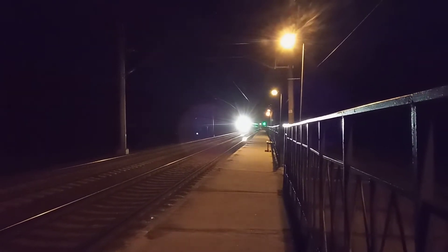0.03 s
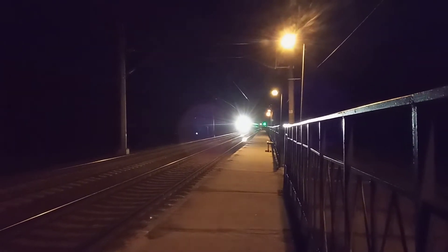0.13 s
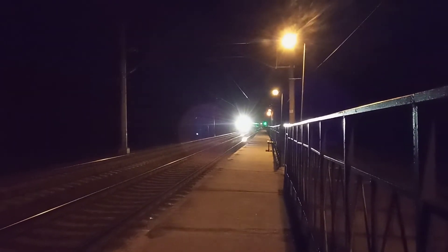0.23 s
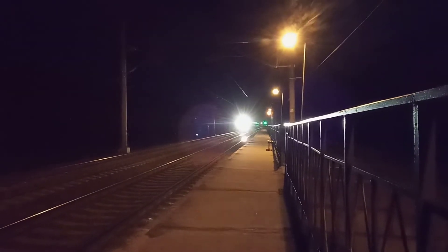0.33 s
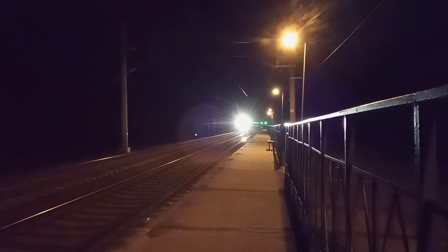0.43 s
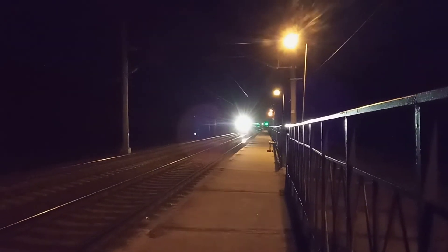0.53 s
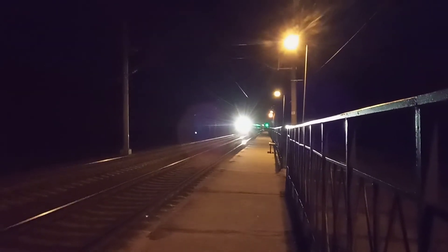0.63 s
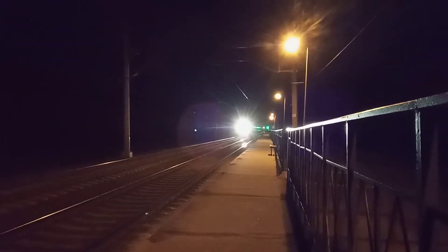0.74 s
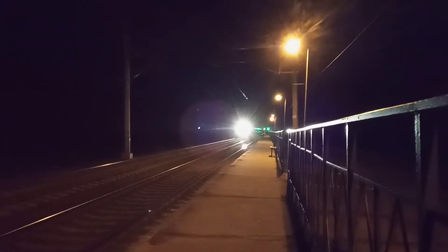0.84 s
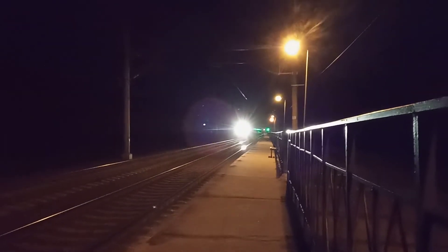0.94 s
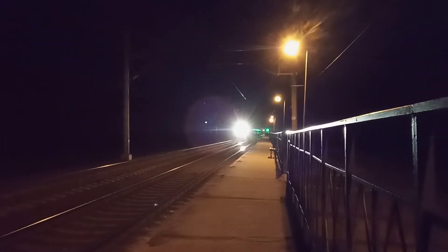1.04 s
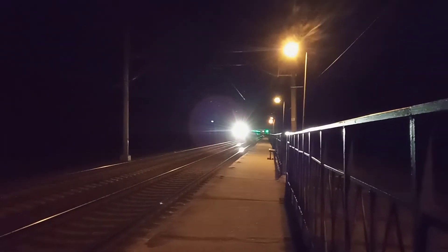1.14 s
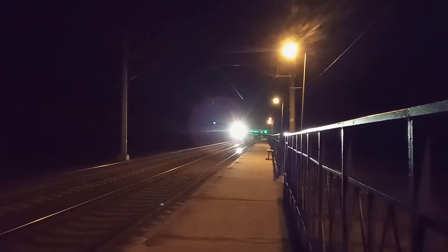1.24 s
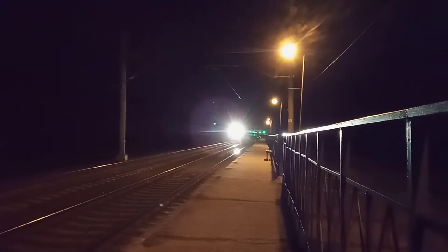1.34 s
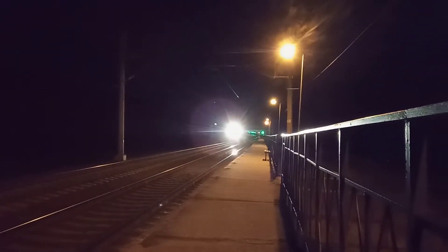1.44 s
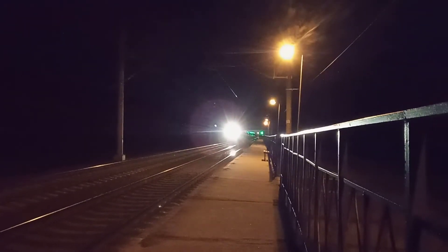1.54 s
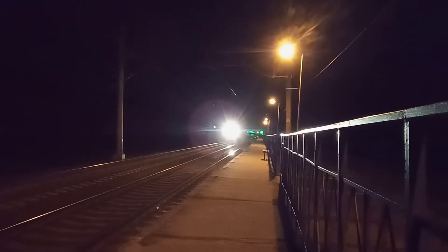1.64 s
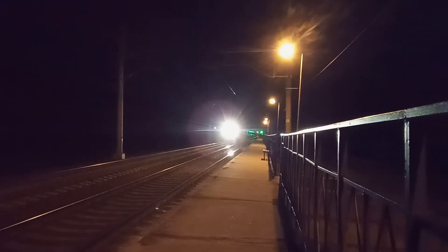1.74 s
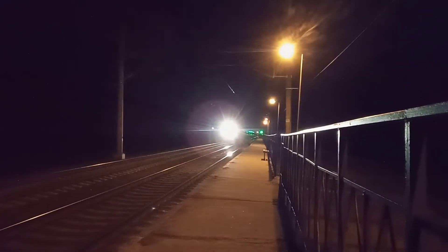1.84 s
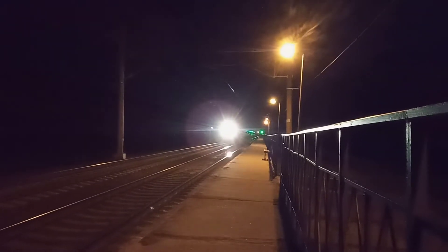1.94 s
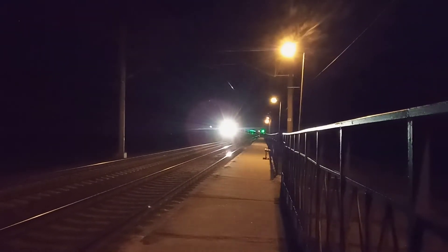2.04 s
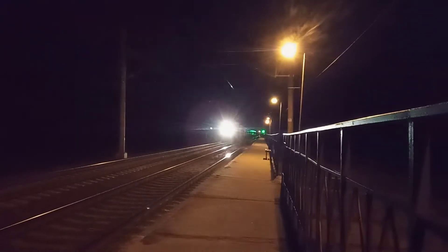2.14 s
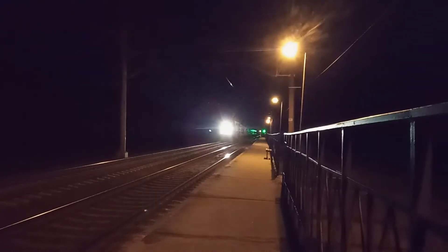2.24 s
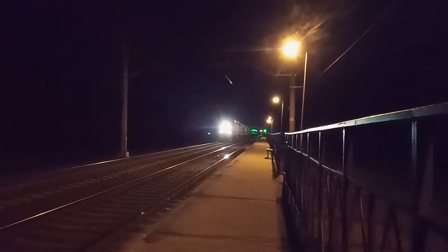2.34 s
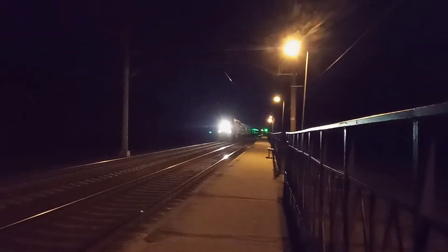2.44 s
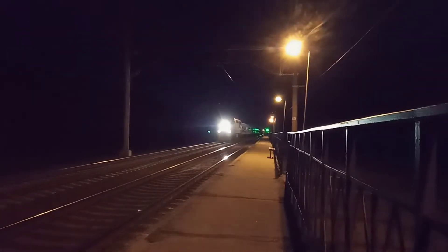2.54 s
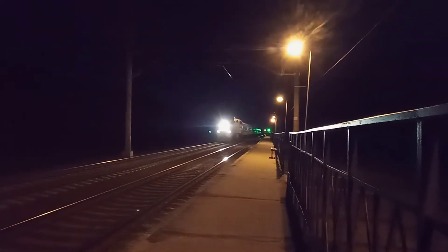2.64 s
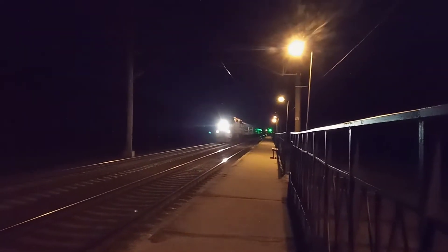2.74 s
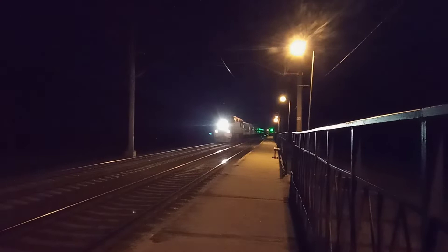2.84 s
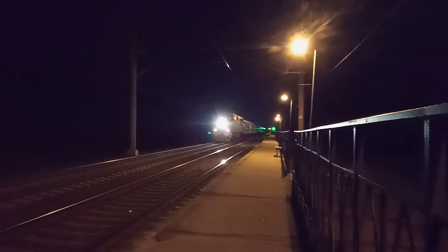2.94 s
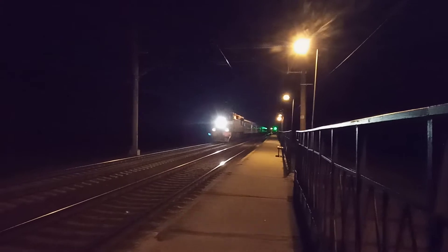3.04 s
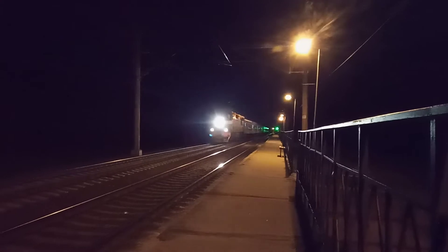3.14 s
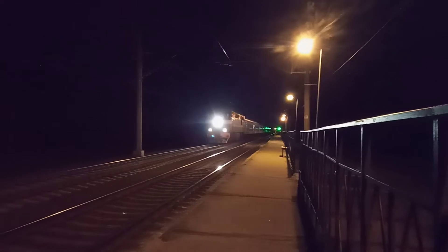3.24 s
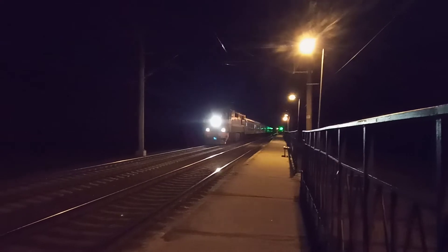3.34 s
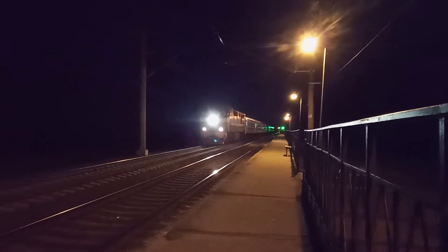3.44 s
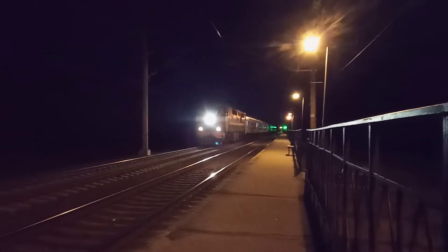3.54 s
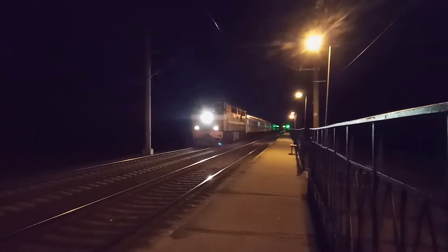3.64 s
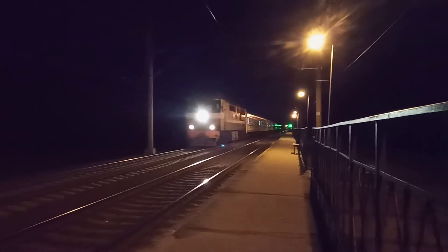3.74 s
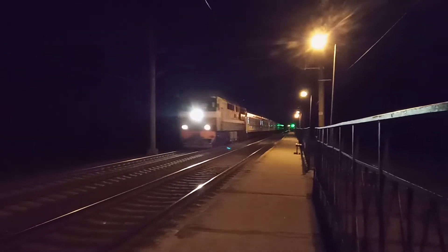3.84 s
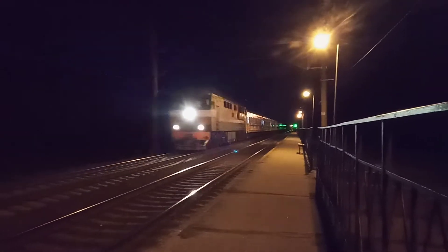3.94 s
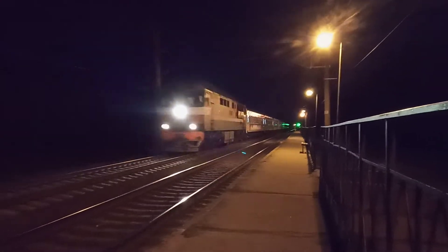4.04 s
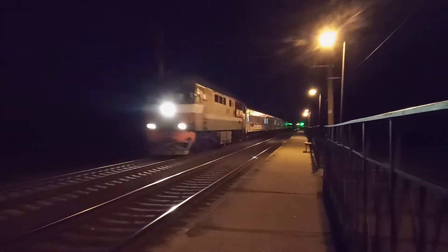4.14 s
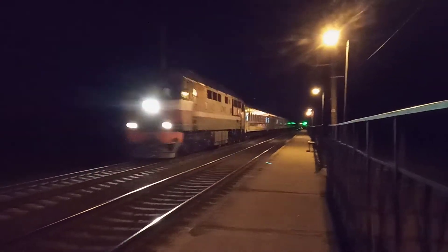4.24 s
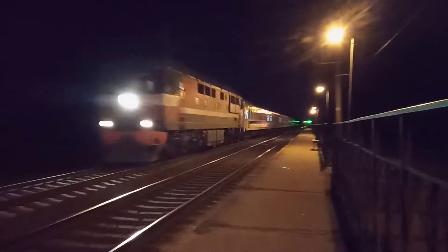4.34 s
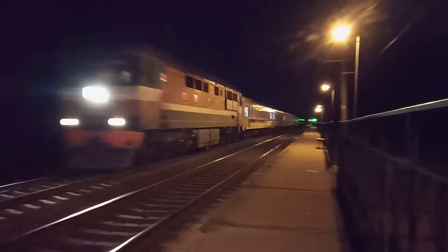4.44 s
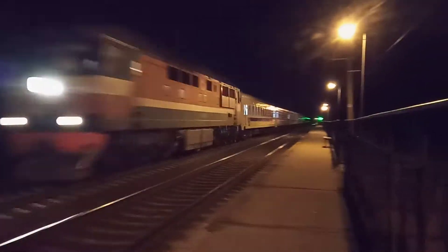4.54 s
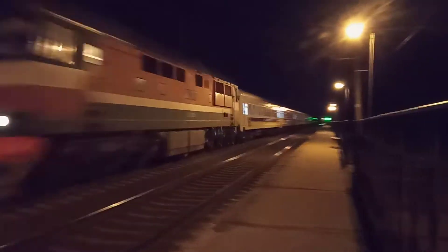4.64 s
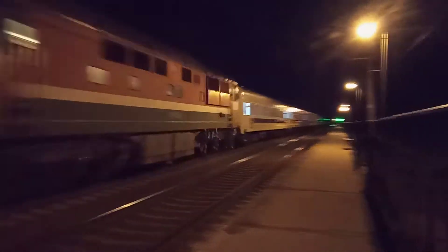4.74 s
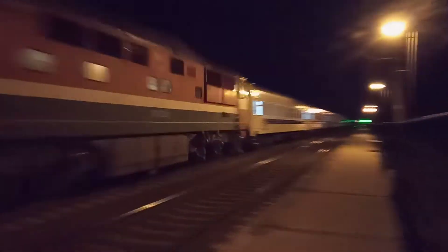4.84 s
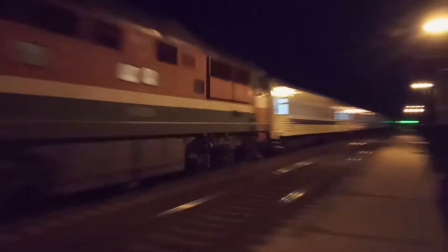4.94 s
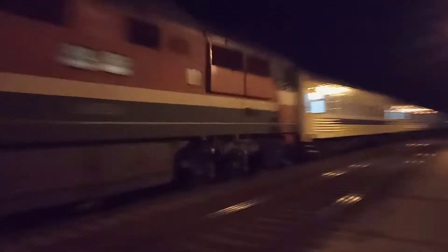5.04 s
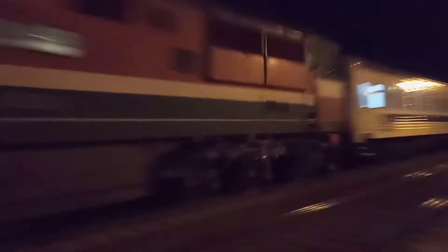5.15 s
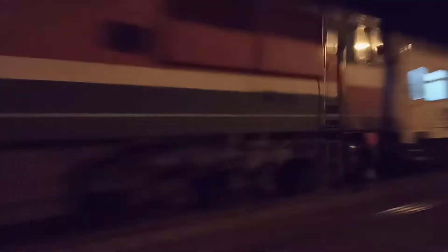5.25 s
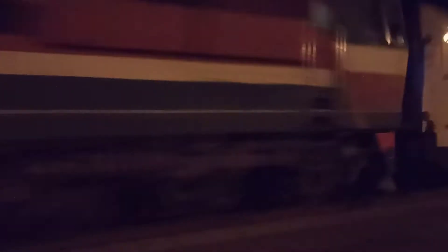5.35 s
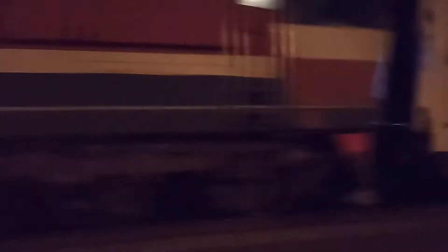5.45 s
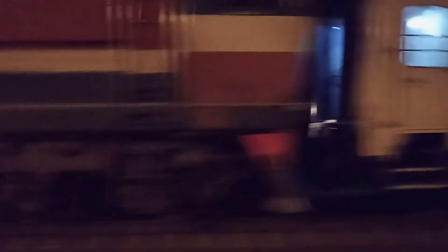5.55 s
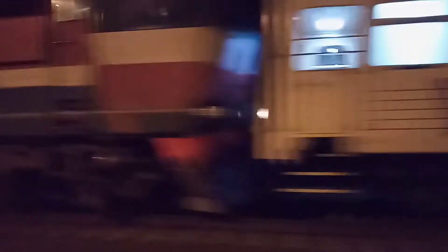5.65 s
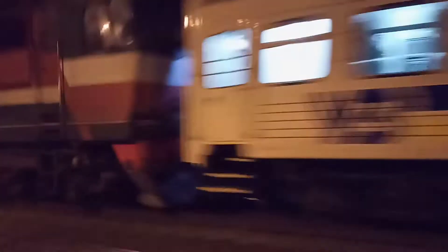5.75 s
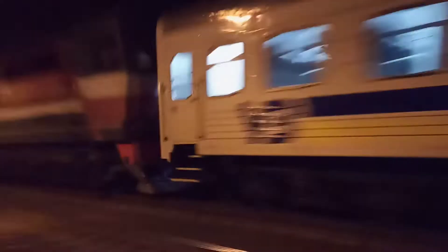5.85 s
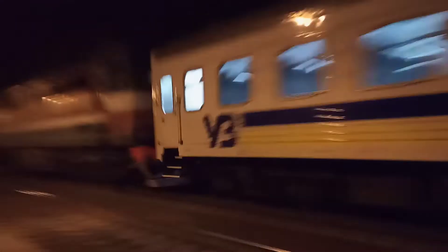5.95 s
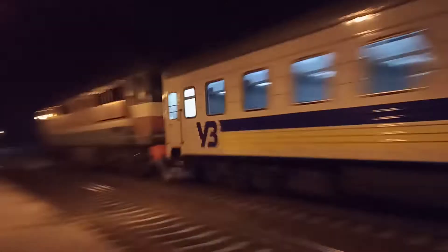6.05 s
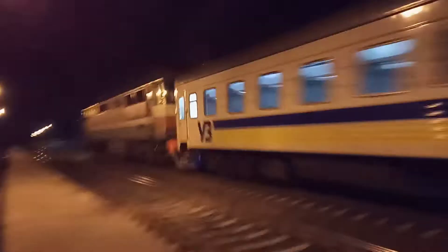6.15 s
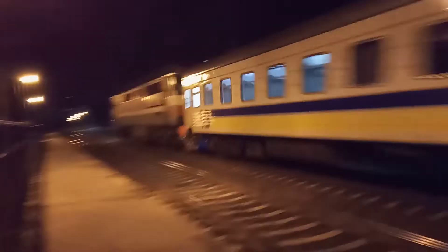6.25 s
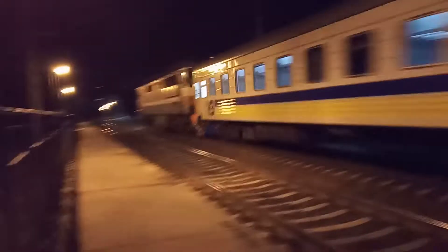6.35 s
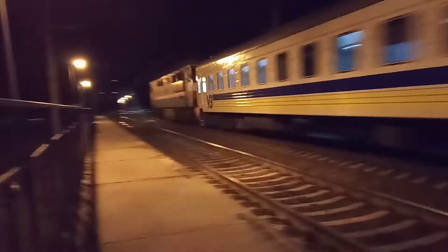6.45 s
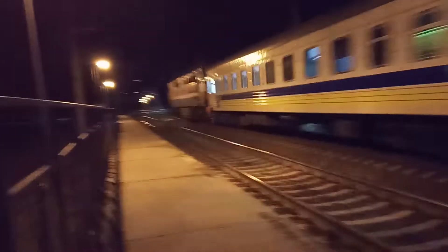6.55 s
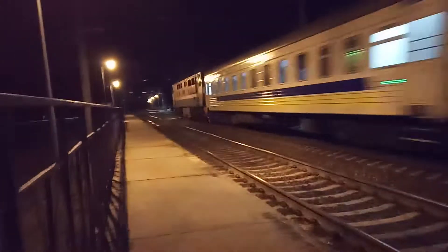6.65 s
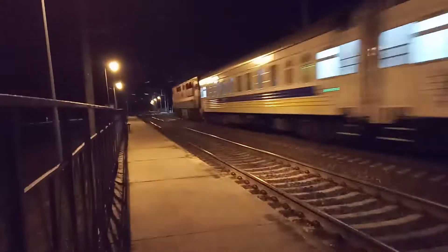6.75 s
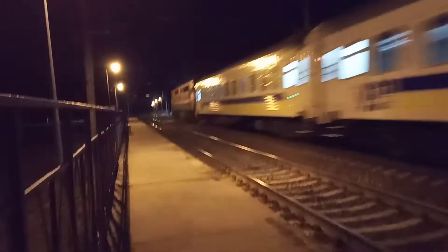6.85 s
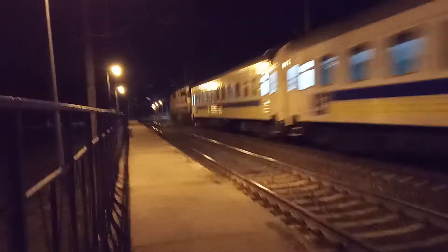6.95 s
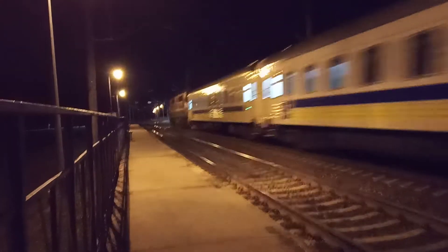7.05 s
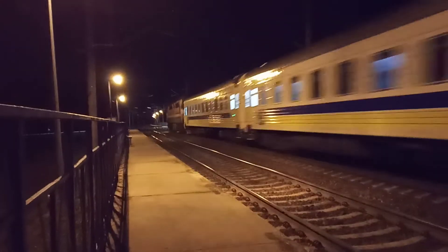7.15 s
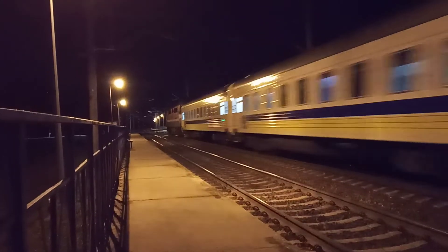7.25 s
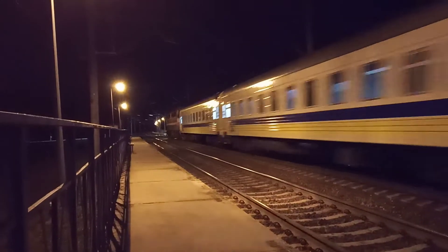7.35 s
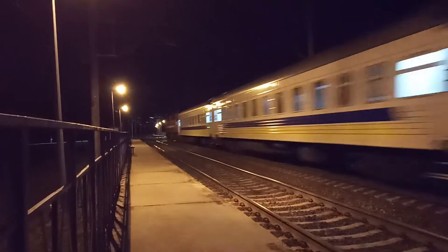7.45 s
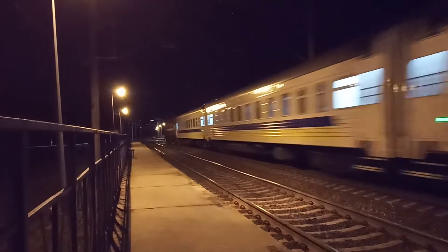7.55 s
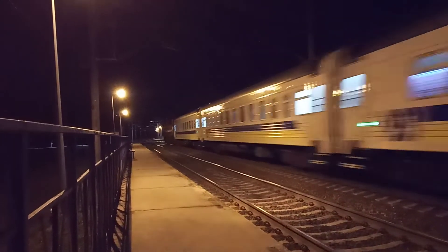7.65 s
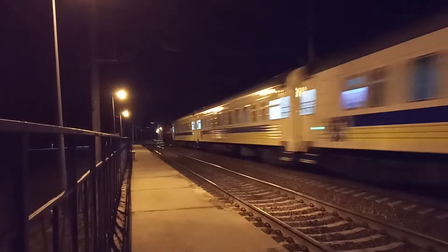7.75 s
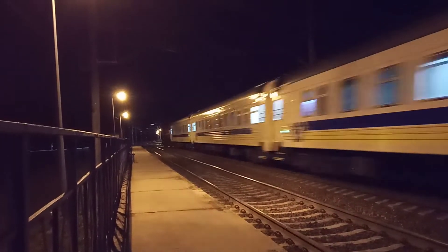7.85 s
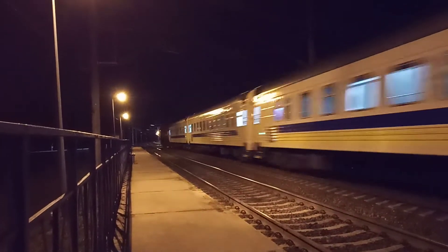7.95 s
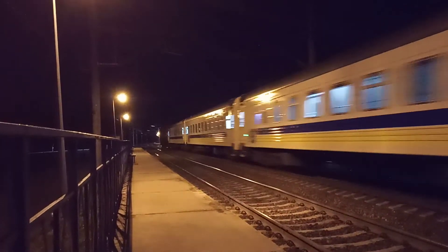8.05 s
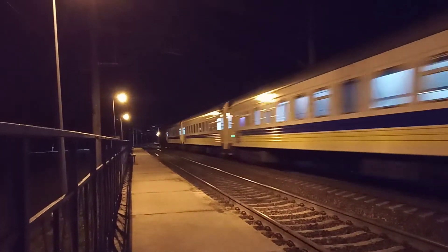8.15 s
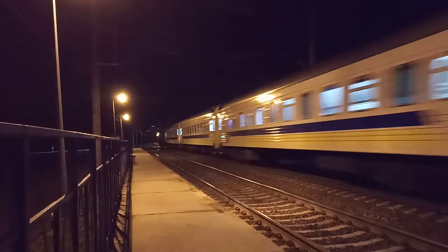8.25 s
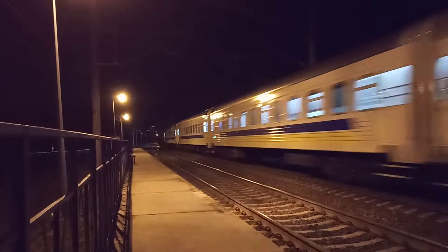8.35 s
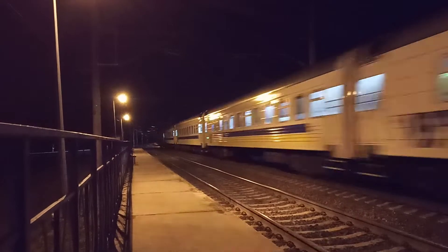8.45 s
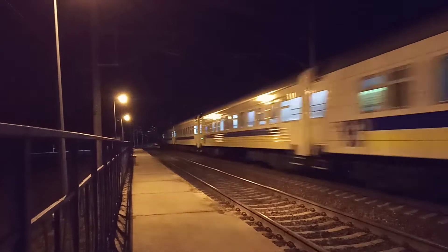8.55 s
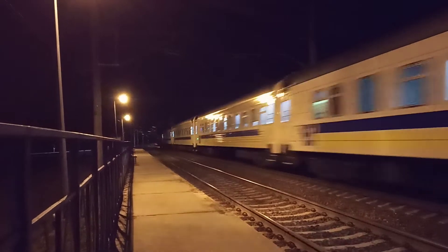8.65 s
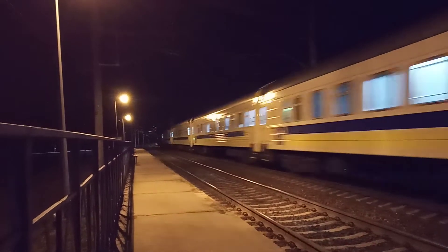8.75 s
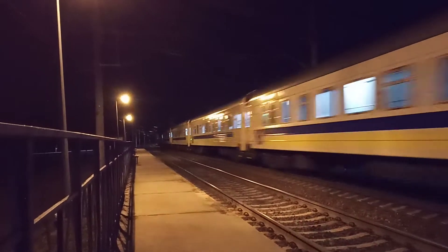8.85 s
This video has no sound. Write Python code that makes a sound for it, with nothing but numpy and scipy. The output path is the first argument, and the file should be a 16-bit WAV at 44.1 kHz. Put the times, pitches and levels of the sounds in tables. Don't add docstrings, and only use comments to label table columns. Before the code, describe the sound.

Hissing, ticking rails precede a fast diesel train; the engine bursts past close by, followed by roaring, humming, squealing coach wheels and joint thuds.

```python
import sys
import numpy as np
from scipy import signal
from scipy.io import wavfile
from scipy.ndimage import map_coordinates

SR = 44100
rng = np.random.default_rng(int(sys.argv[2]) if len(sys.argv) > 2 else 0)


def wav_record(signal):
    frames = np.transpose(np.atleast_2d(signal))
    bounded = np.clip(frames, -1, 1)
    quanta = np.round(bounded * 32767).astype(np.int16)
    wavfile.write(sys.argv[1], SR, quanta)


def ratio_of_db(decibels):
    return 10 ** (np.asarray(decibels, float) / 20)


N = 392931

# t/s, level/dB
RAIL_LEVEL = [
    (0.0, -54),
    (3.0, -50),
    (4.5, -49.2),
    (5.0, -60),
]
# f/Hz, density/dB per Hz
RAIL_HISS = [(5000, -40), (6300, -26), (7200, -22), (8200, -28), (9000, -19), (10100, -14), (12000, -3),
             (13700, 0), (15100, -4)]
# f/Hz, width/Hz, boost/dB
RAIL_MODES = [(6680, 300, 10), (6960, 200, 12), (7500, 250, 9), (8100, 120, 11), (9000, 250, 5),
              (9600, 400, 14), (10450, 250, 4), (11200, 200, 3), (12150, 350, 4), (12750, 250, -4),
              (13350, 250, 6), (13950, 250, 4), (14450, 200, 7), (15600, 250, 4)]
# t/s of the first blow, peak/dB
FAR_JOINTS = [
    (.248, -37),
    (.284, -41),
]
FIRING = np.array([5, 7, 8, 9, 10, 11, 12, 13, 15, 16, 17, 19, 20, 22, 24])
# far off/dB, close by/dB
FIRING_DB = [(-19, -24), (-7, -16), (-5.5, -10), (-10, -12), (-19, -16), (0, 0), (-14, -14), (-12, -6),
             (-20, -9), (-17, -6), (-23, -13), (-20, -15), (-18, -7), (-22, -16), (-19, -20)]
# t/s, level/dB
ECHO = [
    (5.2, -60),
    (5.7, -43),
    (6.2, -41),
    (6.7, -45),
    (7.3, -49),
    (8.0, -52),
    (8.91, -54),
]
# f/Hz, density/dB per Hz
ROAR_FAR = [(45, -14), (125, -21), (256, -16.5), (330, -14.5), (480, -16.5), (664, -15.5), (1000, -18),
            (1500, -17), (2020, -28), (2960, -33), (4260, -33.5), (6120, -47.5), (8400, -46), (15800, -72)]
# f/Hz, density/dB per Hz
ROAR_NEAR = [(60, -9), (120, -10), (179, -5.5), (242, -5.5), (353, -14), (643, -7), (1060, -15),
             (1330, -12.5), (2880, -21), (3440, -20.5), (4200, -22.5), (6750, -25.5), (7850, -30.5),
             (15800, -45)]
# f/Hz, width/Hz, boost/dB
BODY = [(134, 43, -1.5), (250, 80, 5.5), (482, 110, 3.5), (640, 127, 4.5), (1540, 370, 5), (2230, 73, 3),
        (3350, 310, 6), (4950, 230, 2.5), (6560, 190, 11)]
# t/s, level/dB, drone/dB, rumble/dB
BOGIES = [
    (4.45, 1, 4.5, 0),
    (4.82, 2.0, 9, -3.5),
    (5.5, 6, 9, -4),
    (5.85, 3.5, 6, -4.5),
]
# t/s, first partial/dB, second/dB, half length/s
LOUVRES = [
    (4.875, 7, -3, .09),
    (5.09, 0, 1, .04),
    (5.217, 16.5, 6, 0.023),
    (5.286, 12, 6, 0.019),
    (5.319, -5, 10.5, .02),
    (5.352, -9, 0, .02),
    (5.42, 9, 5, .03),
    (5.57, -6, -2, .03),
    (4.3, -1, 0, 0.11),
    (5.492, 11.5, -0.5, 0.02),
]
# f/Hz, density/dB per Hz
ROLLING = [(30, -50), (60, -31), (98, -12), (230, -3.5), (335, -10.5), (596, -1.5), (1170, -10), (1580, 0),
           (2550, -11), (4200, -10), (6420, -17.5), (8050, -25), (12000, -32), (15800, -41)]
# f/Hz, width/Hz, boost/dB
WHEEL = [(605, 230, -0.5), (1464, 155, 3), (1710, 300, 3), (2120, 285, 4), (3260, 460, 1), (4250, 330, 2),
         (4950, 160, -0.5), (6400, 890, 3.5), (8940, 540, 4), (10040, 830, 5)]
# depth/dB, place along the coach/0-1
SWELL = [
    (.6, 0.97),
    (3.5, 0.36),
    (4.0, .7),
]
# t/s, f/Hz, level/dB, half length/s
BOOMING = [
    (4.8, 640, -25, 0.14),
    (4.88, 673, -26, 0.067),
    (5.06, 653, -28, 0.03),
    (5.2, 630, -28.5, 0.078),
    (5.44, 643, -36, 0.032),
    (5.53, 629.5, -24.5, 0.031),
    (5.08, 251, -31, 0.082),
    (5.5, 250, -30, 0.075),
]
# t/s, f/Hz, level/dB, half length/s
GEAR_WHISTLE = [
    (5.23, 5100, -39, .03),
]
# t/s, f/Hz, level/dB
HUMMING = [(5.449, 1295, -40), (5.63, 1245, -31), (5.63, 1630, -33.5), (5.852, 1457, -28),
           (6.07, 1433, -26), (6.16, 1662, -25), (6.27, 1643, -25.5), (6.29, 2170, -34),
           (6.678, 1554, -25.5), (6.72, 1990, -29.5), (6.93, 1430, -29.5), (7.128, 1575, -27),
           (7.15, 2160, -28), (7.441, 1540, -26.5), (7.52, 2060, -31), (7.72, 1740, -38),
           (7.77, 1445, -28.5), (7.881, 1720, -33), (7.95, 2115, -31), (8.23, 1524, -30),
           (8.281, 1633, -30), (8.45, 1397, -30), (8.67, 1400, -27.5), (8.77, 2120, -37)]
# t/s, f/Hz, level/dB, half length/s
SQUEALS = [(5.66, 4330, -30, 0.075), (5.84, 4090, -30, .07), (5.64, 3600, -31.5, 0.067),
           (5.75, 3450, -30, 0.049), (6.06, 3700, -38, .05), (8.15, 5000, -42, .04),
           (8.88, 3420, -30.5, 0.044), (5.78, 4940, -38, 0.13), (6.23, 4240, -32, 0.032),
           (6.37, 5020, -39, 0.091), (6.43, 3340, -36, .09), (6.46, 4350, -38, .09),
           (6.71, 3290, -32.5, 0.12), (6.71, 4950, -33, .07), (7.05, 4250, -34, 0.073),
           (7.2, 4840, -35, .04), (7.28, 4900, -35, .05), (7.36, 4700, -36, .04), (7.29, 3330, -35.5, .08),
           (7.56, 4930, -36, .07), (7.59, 4010, -36, .07), (7.66, 3190, -36, .1), (7.88, 4390, -46, 0.056),
           (8.04, 3350, -38, .07), (8.2, 4250, -34, 0.04), (8.33, 4700, -36, .06), (8.38, 3300, -34, .11),
           (8.68, 3690, -35, 0.14), (8.76, 4290, -38, .06), (8.88, 5000, -39, .05)]
AXLES_M = [0, 2.37, 7.4, 9.8]
# distance from the first/m, peak/dB, f/Hz
JOINTS = [
    (0, -23, 239),
    (4.75, -26, 168.5),
]
COUPLING_DB = [-3, 1, 0.5, -2.5, -10]
# t/s, f/Hz, level/dB, half length/s
FLOORS = [
    (5.95, 580, -31.5, .12),
    (5.9, 930, -33, .1),
    (7.7, 900, -31, 0.11),
    (7.88, 600, -34, 0.055),
    (8.3, 850, -33.5, 0.14),
]

SPEED, TRACK_M, COACH_M = 29.0, 5.9, 24.1
ABREAST_S, LOUDEST_S, TURBO_S = 5.3, 4.89, 5.35
FIRST_COACH_S, LOCO_CLEAR_S = 5.474, 5.75
SHADOW_S, SHADOW_RISE_S = 6.18, 0.12
CLOSE_M, CLOSE_POWER, CLOSE_TOP = 54.5, 1.98, 0.94
TICK_HZ, TICK_SCATTER_HZ, TICK_SCATTER_DB, TICKS_END_S, STEEL_M_S = 13900, 350, 1.5, 3.2, 5000
RAIL_SONG_HZ, RAIL_SONG_SAG_HZ_PER_S, RAIL_SONG_WIDTH_HZ, RAIL_SONG_DB = 6900, 80.0, 150.0, 3
CYCLE_HZ = 6.277
EXHAUST_DB, EXHAUST_SPREAD_M, EXHAUST_SLOPE, EXHAUST_SHADOW_DB = -27, 17.6, 22.3, -6
ROAR_DB, ROAR_SPREAD_M, ROAR_SLOPE, ROAR_SHADOW_DB = -24, 11.64, 14.74, -9
BOGIE_PASS_S, DRONE_FAR_DB, DRONE_NEAR_DB, RUMBLE_FAR_DB, RUMBLE_NEAR_DB = 0.16, 4.5, -6, -1.5, 3
TURBO_HZ, TURBO_DB, TURBO_SPREAD_M = 3267, (-38.5, -41.5, -56.5), (15.5, 3.9, 4.0)
ROLLING_DB, ARRIVE_S, ARRIVE_DB_PER_S = -22.5, 6.14, 13
HUM_HALF_S, FLUTTER_DB, FLUTTER_HZ = .078, 1.2, 45.0
AXLE_DB, JOINT_SCATTER_DB, JOINT_SCATTER_HZ = [2, -6, 3, 1.5], 1, 12.3
RIM_HZ, RIM_DB, RIM_HALF_S, RIM_LAG_S = [3330, 3700, 4280, 4950], -42.5, .07, .12

FRAME = 2048
TIME = np.arange(N) / SR
FRAME_S = np.arange(-(-N // (FRAME // 4)) + 1) * (FRAME // 4) / SR
BIN_HZ = np.arange(FRAME // 2 + 1)[:, None] * SR / FRAME + 1


def curves(rows, at):
    s, *columns = np.transpose(rows)
    return [np.interp(at, s, c) for c in columns]


def colour(points, modes=()):
    hz, db = np.transpose(points)
    bumps = sum(boost_db * np.exp(-2 * ((BIN_HZ - f) / width) ** 2) for f, width, boost_db in modes)
    return np.interp(np.log(BIN_HZ), np.log(hz), db) + bumps


def resonances(modes):
    return colour([(1, 0), (2, 0)], modes)


def walk(rate, size):
    knots = rng.standard_normal(int(size / SR * 2000) + 4)
    w = map_coordinates(knots, [np.arange(size) * min(rate, 1900) / SR], order=2)
    return w / w.std()


def patches(rate, count):
    grid = rng.standard_normal((count, int(N / SR * 40) + 2))
    rows = np.log(np.maximum(BIN_HZ, 40) / 40) / np.log(SR / 80) * (count - 1)
    return map_coordinates(grid, np.broadcast_arrays(rows, FRAME_S * min(rate, 39)), order=1)


def shaped(db, patchy_db, level_db, lo, hi):
    gain = ratio_of_db(db)
    inside = (BIN_HZ[:, 0] > lo) & (BIN_HZ[:, 0] < hi)
    band_rms = np.sqrt(np.sum(gain[inside] ** 2, axis=0) / (FRAME / 2))
    gain = gain * ratio_of_db(level_db + patchy_db) / band_rms
    spectrum = signal.stft(rng.standard_normal(N), nperseg=FRAME, noverlap=3 * FRAME // 4)[2]
    return signal.istft(spectrum * gain, nperseg=FRAME, noverlap=3 * FRAME // 4)[1][:N]


def below(hz):
    return 1 / (1 + (BIN_HZ / hz) ** 4)


def bump(t, s, half):
    return np.exp(-.5 * ((t - s) / half) ** 2)


def add(track, sound, s):
    i = int(s * SR)
    track[i:i + len(sound)] += sound[:N - i]


def doppler(t, metres):
    return 1 / (1 + SPEED / 343 * SPEED * t / np.hypot(SPEED * t, metres))


def away(t, abreast_s):
    return SPEED * np.abs(t - abreast_s)


def spreading(t, abreast_s, size_m, slope):
    return -slope * np.log10(np.hypot(away(t, abreast_s), size_m) / size_m)


def closeness(t):
    metres = away(np.minimum(t, LOUDEST_S), LOUDEST_S)
    return CLOSE_TOP / (1 + (metres / CLOSE_M) ** CLOSE_POWER)


def shadow(t):
    return .5 + .5 * np.tanh((t - SHADOW_S) / SHADOW_RISE_S)


def axles(first_s, speed):
    return first_s + (np.arange(5)[:, None] * COACH_M + np.array(AXLES_M)) / speed


def blow(t, decay_s):
    return np.exp(1 - t / decay_s) * t / decay_s


def singing(events, spread, metres):
    out = np.zeros(N)
    t = np.arange(-SR // 3, SR // 3) / SR
    for s, hz, db, half in events:
        shake = walk(spread * hz, len(t)) + 1j * walk(spread * hz, len(t))
        turns = np.cumsum(hz * doppler(t, metres)) / SR
        level = ratio_of_db(db + FLUTTER_DB * walk(FLUTTER_HZ, len(t))) * bump(t, 0, half)
        add(out, level * np.real(shake * np.exp(2j * np.pi * turns)), s + t[0])
    return out


def rail():
    level_db = curves(list(RAIL_LEVEL) + [(5.8, -70)], FRAME_S)[0]
    near = np.clip(FRAME_S / 3.75, 0, 1)
    db = colour(RAIL_HISS) + (1 - 0.31 * near) * resonances(RAIL_MODES)
    db = db + 38.0 * near ** 1.14 * below(11300)
    song_hz = RAIL_SONG_HZ - RAIL_SONG_SAG_HZ_PER_S * FRAME_S
    db = db + near * RAIL_SONG_DB * bump(BIN_HZ, song_hz, RAIL_SONG_WIDTH_HZ / 2)
    out = shaped(db, 1.1 * patches(rate=14., count=120), level_db, 10600, 14750)
    t = np.arange(SR // 25) / SR
    for first_s, peak_db in FAR_JOINTS:
        times = axles(first_s, SPEED / (1 - SPEED / STEEL_M_S)).ravel()
        chance = rng.standard_normal((times.size, 2))
        for s, (a, b) in zip(times[times < TICKS_END_S], chance):
            turn = 2 * np.pi * (TICK_HZ + TICK_SCATTER_HZ * b) * t
            carrier = np.sin(turn + 1.6 * walk(1200., len(t)))
            add(out, ratio_of_db(peak_db - 7.5 + TICK_SCATTER_DB * a) * blow(t, .0035) * carrier, s)
    return out


def exhaust():
    turns = np.cumsum(CYCLE_HZ * doppler(TIME - ABREAST_S, TRACK_M)) / SR
    near = np.clip(closeness(TIME), 0, 1)
    direct = np.zeros(N)
    for k, (far_db, near_db) in zip(FIRING, FIRING_DB):
        partial_db = far_db + near * (near_db - far_db) + 1.5 * walk(4.0, N)
        direct += ratio_of_db(partial_db) * np.sin(2 * np.pi * (k * turns + rng.random()))
    back = CYCLE_HZ / (1 - SPEED / 343) * TIME
    echo = sum(ratio_of_db(db) * np.sin(2 * np.pi * (k * back + rng.random())) for k, db in ((11, 0), (20, -8.0)))
    level_db = EXHAUST_DB + spreading(TIME, LOUDEST_S - .05, EXHAUST_SPREAD_M, EXHAUST_SLOPE)
    level_db = level_db + EXHAUST_SHADOW_DB * shadow(TIME + 0.41)
    return direct * ratio_of_db(level_db) + np.sqrt(2) * echo * ratio_of_db(curves(ECHO, TIME)[0])


def roar():
    near = np.clip(closeness(FRAME_S), 0, 1.3)
    passing = sum(bump(FRAME_S, s, BOGIE_PASS_S) * np.array(dbs)[:, None] for s, *dbs in BOGIES)
    loud_db, drone_db, low_db = passing
    level_db = ROAR_DB + spreading(FRAME_S, LOUDEST_S + 0.094, ROAR_SPREAD_M, ROAR_SLOPE)
    level_db = level_db + ROAR_SHADOW_DB * shadow(FRAME_S) + loud_db
    drone_db = drone_db + DRONE_FAR_DB + near * (DRONE_NEAR_DB - DRONE_FAR_DB)
    low_db = low_db + RUMBLE_FAR_DB + near ** 3 * (RUMBLE_NEAR_DB - RUMBLE_FAR_DB)
    near = near - 0.17 * bump(FRAME_S, 6.0, 0.27)
    db = (1 - near) * colour(ROAR_FAR) + near * colour(ROAR_NEAR)
    drowned = np.minimum(1.04 * near ** 4, 1) * (1 - below(1340))
    db = db + resonances(BODY) * (1 - drowned)
    db = db - 78.0 * (1 - np.minimum(near, 1)) ** 6 * (1 - below(8000))
    db = db + low_db * below(550) + drone_db * (below(820) - below(400))
    return shaped(db, 0.47 * patches(rate=9.0, count=30), level_db, 400, 1630)


def turbo():
    pitch = TURBO_HZ * doppler(TIME - TURBO_S, TRACK_M) * (1 + 0.00304 * walk(90., N))
    turns = np.cumsum(pitch) / SR
    first_db, second_db = sum(bump(TIME, s, half) * np.array(dbs)[:, None] for s, *dbs, half in LOUVRES)
    out = np.zeros(N)
    partials = zip(TURBO_DB, TURBO_SPREAD_M, (first_db, second_db, 0))
    for k, (db, size_m, seen_db) in enumerate(partials, 1):
        level_db = db + seen_db + spreading(TIME, TURBO_S - .1, size_m, 21.0) + 3.0 * walk(30., N)
        out += np.sqrt(2) * ratio_of_db(level_db) * np.sin(2 * np.pi * k * turns)
    return out * np.interp(TIME, [3.9, 4.2, 5.7, 5.85], [0, 1, 1, 0])


def rolling():
    coach = (FRAME_S - FIRST_COACH_S) * SPEED / COACH_M
    swells = (depth_db * np.cos(2 * np.pi * (coach - place)) for depth_db, place in SWELL)
    loud_db, rumble_db, boom_db = swells
    level_db = ROLLING_DB + loud_db - ARRIVE_DB_PER_S * np.maximum(ARRIVE_S - FRAME_S, 0)
    db = colour(ROLLING, WHEEL) + rumble_db * (below(476) - below(95))
    db = db - 2.5 * np.maximum(coach - 1.5, 0) * below(95)
    db = db + boom_db * (below(980) - below(570))
    patchy_db = (1.33 + 0.3 * below(2500)) * patches(rate=14., count=60)
    fade = np.clip((TIME - 4.2) / 1.6, 0, 1)
    return fade * shaped(db, patchy_db, level_db, 800, 3200)


def underframe():
    return singing(BOOMING, spread=.08, metres=25.0)


def gear_whistle():
    return singing(GEAR_WHISTLE, spread=.05, metres=11.0)


def wheel_hums():
    return singing([(*row, HUM_HALF_S) for row in HUMMING], spread=.058, metres=10.0)


def wheel_squeals():
    return singing(SQUEALS, spread=.05, metres=11.0)


def thuds():
    out, t = np.zeros(N), np.arange(SR // 8) / SR
    for metres, db, hz in JOINTS:
        times = axles(FIRST_COACH_S + metres / SPEED, SPEED)
        dbs = db + np.add.outer(COUPLING_DB, AXLE_DB)
        chance = rng.standard_normal((times.size, 2))
        for s, axle_db, (a, b) in zip(times.ravel(), dbs.ravel(), chance):
            if LOCO_CLEAR_S < s < N / SR:
                turn = 2 * np.pi * (hz + JOINT_SCATTER_HZ * b) * t
                bounce = np.sin(turn) + .5 * np.sin(.68 * turn)
                add(out, ratio_of_db(axle_db + JOINT_SCATTER_DB * a) * blow(t, .0045) * bounce, s)
    return out


def floors():
    return singing(FLOORS, spread=.3, metres=25.0)


def rims():
    rows = []
    for k, s in enumerate(axles(FIRST_COACH_S + RIM_LAG_S, SPEED).ravel()):
        if 6 < s < N / SR:
            hz = RIM_HZ[k % 4] * (.98 + .04 * rng.random())
            rows.append((s, hz, RIM_DB + 4.0 * rng.random(), RIM_HALF_S))
    return singing(rows, spread=.022, metres=9.0)


def scene():
    locomotive = exhaust() + roar() + turbo() + underframe() + gear_whistle()
    coaches = rolling() + wheel_hums() + wheel_squeals() + thuds() + floors() + rims()
    mono = rail() + locomotive + coaches
    return np.array([mono, mono])


def roll_off(x):
    return signal.sosfilt(signal.butter(12, 15960, fs=SR, output="sos"), x)


def record(dry):
    no_bass = signal.sosfilt(signal.butter(3, 46., "high", fs=SR, output="sos"), dry)
    rounded = np.tanh(1.3 * no_bass) / 1.3
    mix = signal.sosfilt(signal.ellip(12, .2, 70, 15720, fs=SR, output="sos"), rounded)
    return roll_off(mix)


dry = scene()
out = record(dry)
wav_record(out)
```